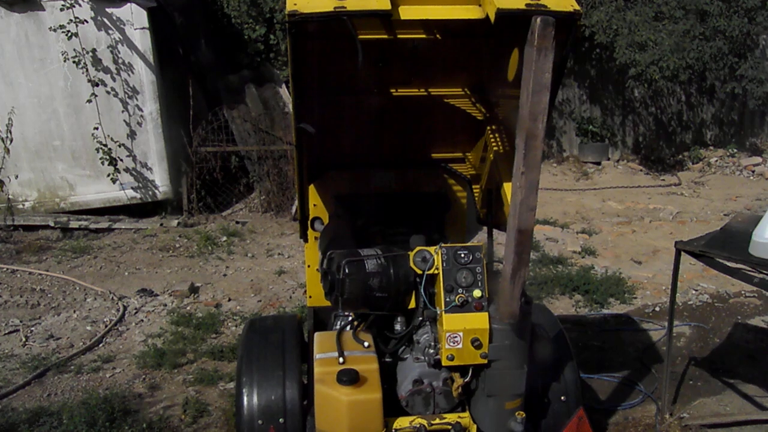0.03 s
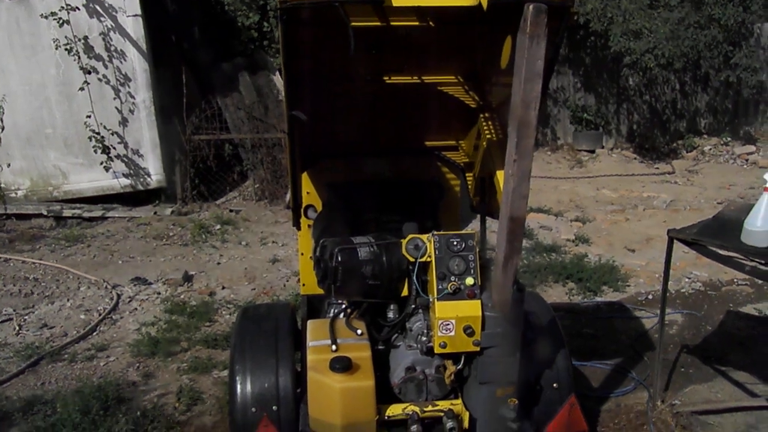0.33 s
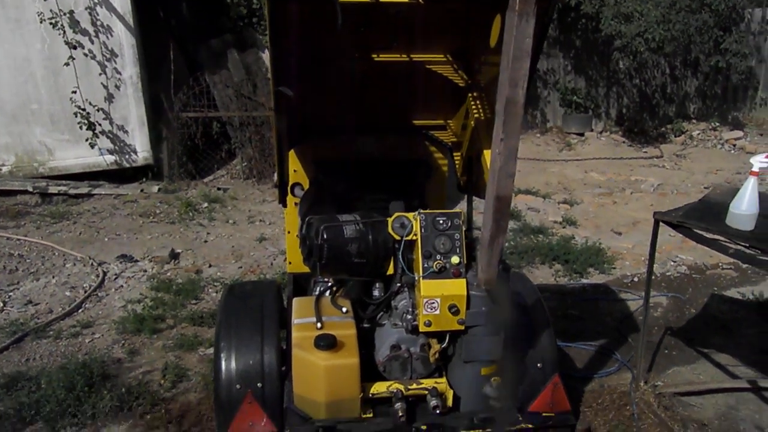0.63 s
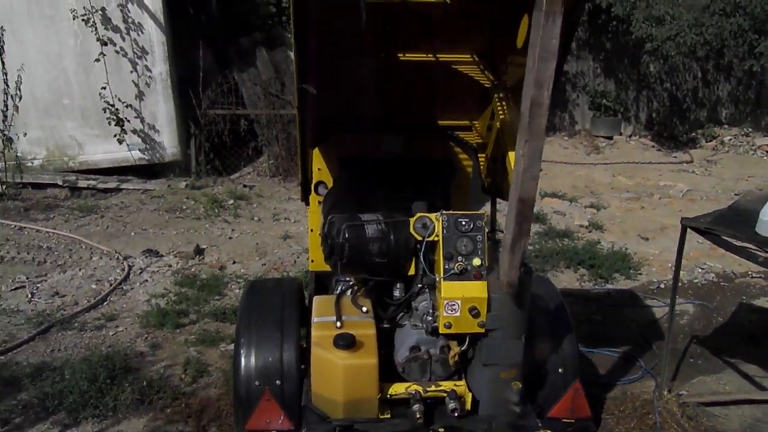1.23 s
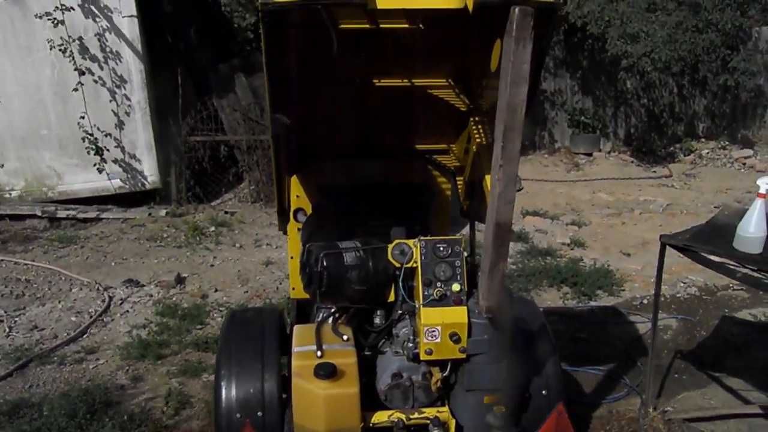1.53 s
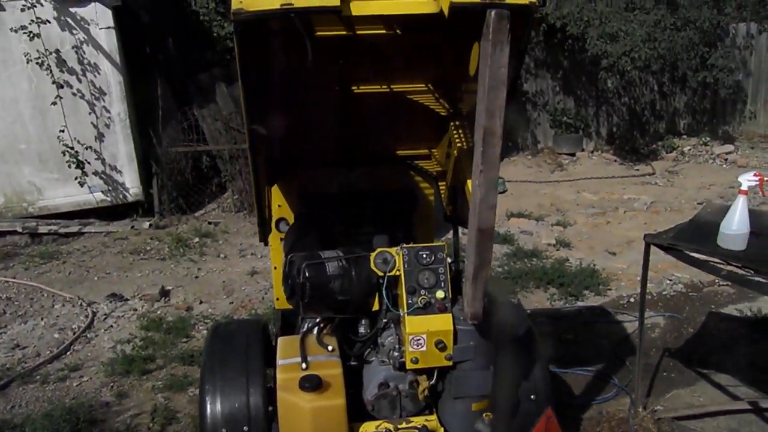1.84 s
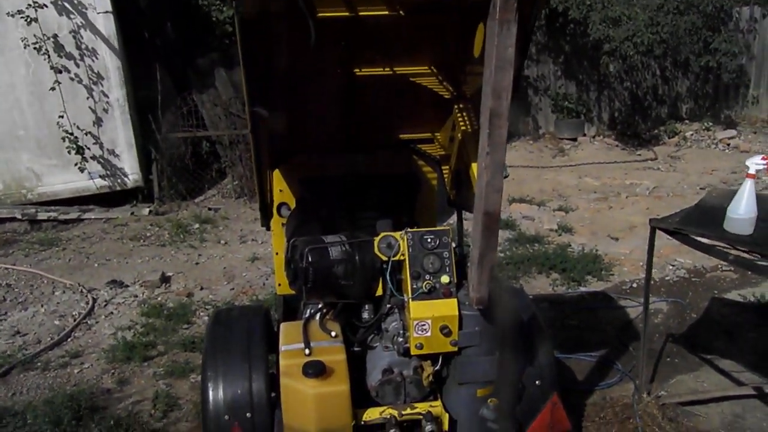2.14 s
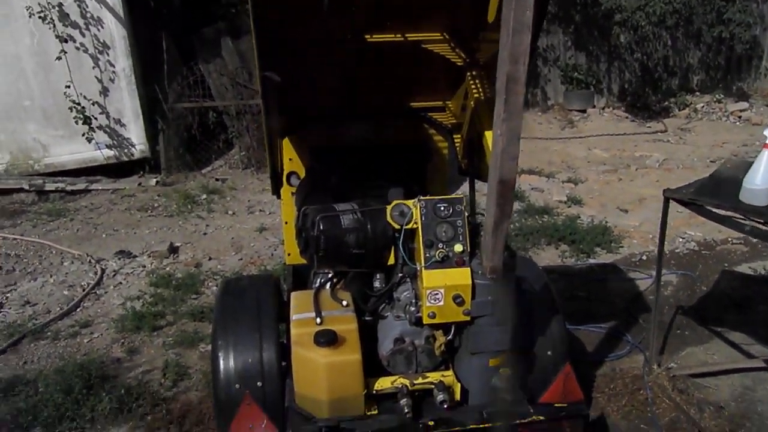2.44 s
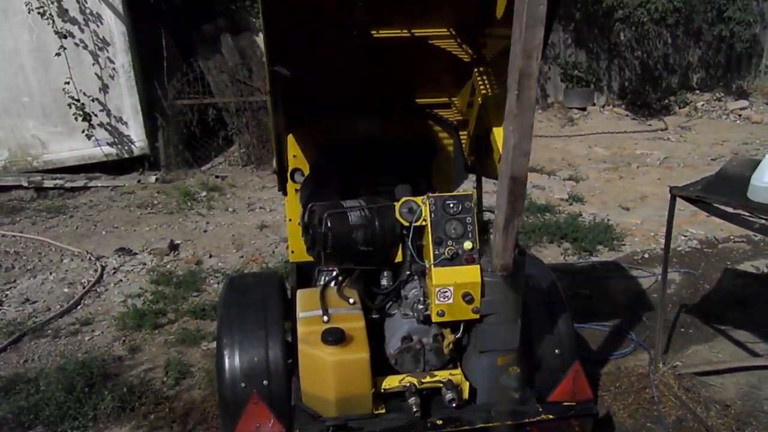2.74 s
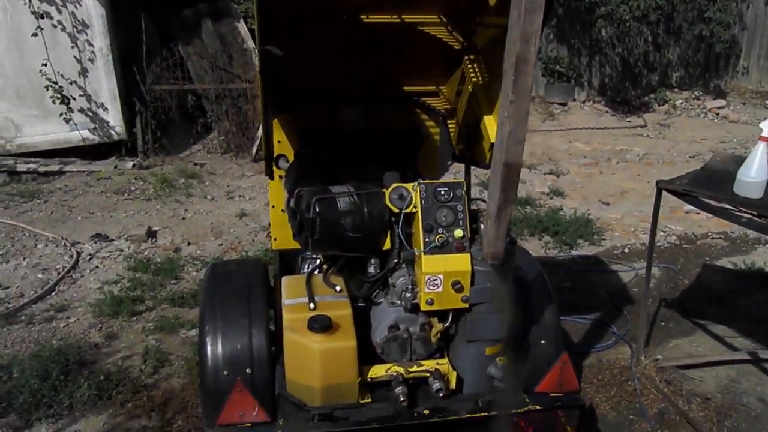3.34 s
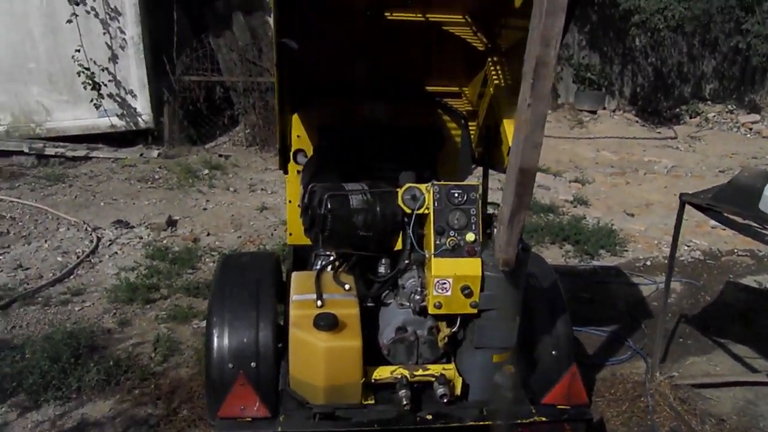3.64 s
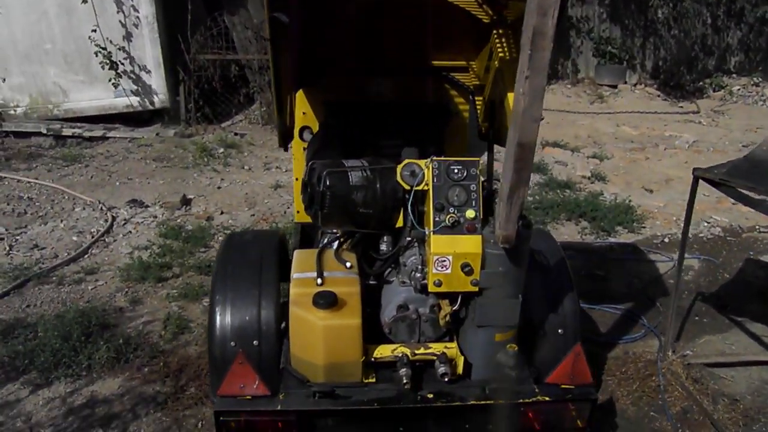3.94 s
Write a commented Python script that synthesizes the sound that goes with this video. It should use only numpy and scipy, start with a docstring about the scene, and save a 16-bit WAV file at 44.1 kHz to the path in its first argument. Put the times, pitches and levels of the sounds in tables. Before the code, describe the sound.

A diesel air compressor runs, hissing steadily over its knocking, clattering engine.

```python
"""A steady hiss of compressed air over a knocking diesel: a towed screw compressor, hood up, in a yard.
The rushing air rings in the pipes and the tank. The three-cylinder engine pulses, knocks and clatters
in the same pattern every cycle and makes a panel drone; the screw rotors add a thin whine.
Something near the microphone, probably a hand, colours the sound, then slides away by about 1.4 s."""
import sys
import numpy as np
from scipy import signal
from scipy.fft import rfft, irfft
from scipy.io import wavfile
from scipy.ndimage import map_coordinates

SR = 44100
rng = np.random.default_rng(int(sys.argv[2]) if len(sys.argv) > 2 else 0)


def persist_wave(psi):
    """Save psi, clipped to +-1, as 16-bit WAV."""
    counts = np.round(np.clip(psi, -1, 1) * 32767).astype(np.int16)
    wavfile.write(sys.argv[1], SR, np.atleast_2d(counts).T)


N = 176400
TIME_S = np.arange(N) / SR
BINS_HZ = np.arange(N // 2 + 1) * SR / N
CYCLE_HZ = 13.4


def from_db(db):
    return 10 ** (np.asarray(db) / 20)


def unit_rms(x):
    return x / np.sqrt(np.mean(x ** 2) + 1e-20)


def at_hz(points, hz):
    """Read a dB spectrum on a log-frequency axis."""
    f, db = np.transpose(points)
    return np.interp(np.log(np.maximum(hz, 1)), np.log(f), db)


def in_time(points):
    return np.interp(TIME_S, *np.transpose(points))


def drift(rate_hz):
    """Random wander through unit-variance knots."""
    return np.interp(TIME_S * rate_hz, np.arange(1000), rng.standard_normal(1000))


def noise(gain):
    """Noise of the given amplitude per root hertz."""
    return irfft(rfft(rng.standard_normal(N)) * gain, N) * np.sqrt(SR / 2)


def cycle_gain(cycles, spread_db=.8):
    """A fresh random strength for each engine cycle."""
    return from_db(spread_db * rng.standard_normal(100)[np.floor(cycles).astype(int) + 2])


# Turbulence spectrum: f/Hz, density/dB
AIR_SPECTRUM = [(1500, -88), (2600, -67.5), (2850, -69.5), (3100, -63.5), (3500, -64), (4200, -65.5),
                (5000, -65), (6000, -65), (7000, -64), (8200, -64), (9200, -62.5), (10500, -62),
                (11600, -63.5), (13000, -68), (14000, -70), (15700, -67.5)]
# Pipe and tank resonances: f/Hz, width/Hz, lift/dB
PIPE_RESONANCES = [(2960, 70, 6), (3193, 40, 9), (3305, 45, 8.5), (3490, 100, 6), (3675, 35, 5),
                   (3810, 45, 4), (4000, 120, 4), (4545, 70, 8.5), (4920, 70, 3), (5125, 35, 10),
                   (5200, 100, 5), (5690, 90, 8.5), (6040, 50, 5), (7320, 90, 4), (8540, 90, 7.5),
                   (8940, 70, 6), (9160, 80, 9), (9300, 70, 5), (9450, 70, 4), (9905, 45, 9),
                   (10010, 80, 7), (10350, 90, 6), (10555, 60, 6), (10810, 50, 5), (11150, 70, 4),
                   (11480, 80, 5.5), (11640, 80, 5.5), (12240, 100, 5.5), (12880, 70, 5), (13260, 80, 5),
                   (14520, 90, 3), (15060, 100, 6), (15260, 60, 5)]
# Flow strength: t/s, gain/dB
AIR_GAIN = [(.1, 1), (.8, 1), (1.3, 0.5), (1.8, 0.8), (2.4, 0.6), (3.0, 1), (3.5, 0), (4, 1.5)]

def air(cycles, flutter_db=.8, throb_db=.06):
    """Turbulent air rings pipes and tank; the flow flutters and throbs faintly with the firings."""
    power_lift = 1 + sum((from_db(db) ** 2 - 1) / (1 + (2 * (BINS_HZ - hz) / width_hz) ** 2) ** 1.5
                         for hz, width_hz, db in PIPE_RESONANCES)
    firing = np.cos(2 * np.pi * 3 * (cycles - .05))
    gain_db = in_time(AIR_GAIN) + flutter_db * drift(40) + throb_db * firing
    hiss = noise(from_db(at_hz(AIR_SPECTRUM, BINS_HZ)) * np.sqrt(power_lift))
    return from_db(gain_db) * hood_reflections(hiss)


def hood_reflections(x, depth_db=2.8, spacing_hz=75, rate_hz=1.4):
    """Reflections under the hood add and cancel differently as the microphone sways."""
    hz, times_s, frames = signal.stft(x, SR, nperseg=4096)
    grid = np.meshgrid(hz / spacing_hz, times_s * rate_hz, indexing="ij")
    ripple = map_coordinates(rng.standard_normal((1024, 64)), grid, order=1, mode="wrap")
    return signal.istft(frames * from_db(depth_db * ripple), SR)[1][:N]


# Combustion knocks and valve clacks: phase/cycles, f/Hz, width/Hz, rms level/dB, decay/s
KNOCK_PATTERN = [(.985, 2330, 480, -38.8, .003), (.02, 1950, 600, -43.5, .007),
                 (.305, 1900, 330, -43.5, .005), (.365, 1470, 240, -47, .005), (.43, 1850, 600, -52, .006),
                 (.635, 1480, 260, -51, .004), (.655, 2030, 600, -45, .005), (.735, 1680, 480, -45, .005),
                 (.85, 1800, 450, -53, .005)]
# Engine block modes: f/Hz, relative level/dB
BLOCK_RESONANCES = [(1190, 18), (1420, 10), (1475, 9), (1545, -16), (1700, 1), (1770, 2), (1878, 10),
                    (1960, -6), (2105, 4), (2225, 3), (2340, 1), (2470, 4), (2590, -3.5)]

def knocks(cycles, attack_s=.001, grit_db=-2.5):
    """Each knock rings the block modes near its pitch, alike in every cycle but with fresh grit."""
    out = 0
    mode_hz, mode_db = np.transpose(BLOCK_RESONANCES)
    ring_s = np.linspace(0, 1 / CYCLE_HZ, 4000)
    for phase, hz, width_hz, db, decay_s in KNOCK_PATTERN:
        age_s = (cycles - phase) % 1 / CYCLE_HZ
        envelope = np.minimum(age_s / attack_s, 1) * np.exp(-np.maximum(age_s - attack_s, 0) / decay_s)
        weights = from_db(mode_db) / (1 + (2 * (mode_hz - hz) / width_hz) ** 2)
        ring = np.sin(2 * np.pi * (ring_s[:, None] * mode_hz + rng.random(len(mode_hz)))) @ weights
        grit = noise(1 / (1 + (2 * (BINS_HZ - hz) / width_hz) ** 2))
        knock = unit_rms(envelope * np.interp(age_s, ring_s, ring))
        knock += from_db(grit_db) * unit_rms(envelope * grit)
        out += from_db(db) * cycle_gain(cycles - phase) * unit_rms(knock)
    return out


# Gear and valve train spectrum: f/Hz, density/dB
GEAR_SPECTRUM = [(60, -100), (180, -80.5), (280, -84.5), (350, -76), (420, -82.5), (560, -71.5), (700, -79),
                 (1050, -75), (1500, -84), (2200, -66), (3000, -111)]
# Loose-part spectrum: f/Hz, density/dB
RATTLE_SPECTRUM = [(25, -95), (60, -96), (130, -91), (210, -79.5), (300, -71), (420, -80), (600, -69.5),
                   (800, -70), (1100, -76.5), (1500, -69.5), (2100, -70), (2800, -80), (4000, -74)]
# Strength of both: t/s, gain/dB
CLATTER_GAIN = [(.1, 0), (1.3, 0), (1.55, -0.5), (1.9, -0.5), (2.6, -2), (3.3, -1.5), (4, -1)]

def clatter(cycles, size=8192):
    """Gears and valve train repeat one dense pattern each cycle; loose parts rattle at random."""
    hz = np.arange(size // 2 + 1) * CYCLE_HZ
    in_band = (hz > 0) & (hz < GEAR_SPECTRUM[-1][0])
    lines = from_db(at_hz(GEAR_SPECTRUM, hz)) * in_band * np.exp(2j * np.pi * rng.random(len(hz)))
    pattern = irfft(lines) * size * np.sqrt(CYCLE_HZ / 2)
    gears = np.interp(cycles, np.arange(size) / size, pattern, period=1)
    rattle = noise(from_db(at_hz(RATTLE_SPECTRUM, BINS_HZ)))
    return from_db(in_time(CLATTER_GAIN)) * (gears + rattle)


# Panel swells: phase/cycles, f/Hz, Gaussian sigma/s, relative level/dB
PANEL_SWELLS = [(.1869, 565, .0051, -5), (.6676, 561, .0146, -1.5), (.9402, 533, .0059, 0)]

def panel(cycles, level_db=-36.5):
    """A sheet-metal panel drones in three uneven swells per cycle, one per cylinder."""
    out = 0
    for phase, hz, sigma_s, db in PANEL_SWELLS:
        swell_cycles = cycles - phase + .5
        offset_s = (swell_cycles % 1 - .5) / CYCLE_HZ
        swell = np.exp(-.5 * (offset_s / sigma_s) ** 2) * np.cos(2 * np.pi * hz * offset_s)
        out += from_db(level_db + db) * cycle_gain(swell_cycles) * swell
    return out


# Exhaust and block tones: multiple of the cycle rate, rms level/dB
EXHAUST_ORDERS = [(6, -67), (9, -60.5), (12, -63), (18, -57), (19, -63.5), (21, -55), (24, -60.5),
                  (35, -69.5), (54, -55.5), (65, -75), (75, -63.5), (78, -58.5)]

def exhaust(cycles, waver_db=3.1):
    """Clean tones locked to the crankshaft, each wavering in level."""
    out = 0
    for order, db in EXHAUST_ORDERS:
        amplitude = from_db(db + waver_db * drift(4.96)) * np.sqrt(2)
        out += amplitude * np.sin(2 * np.pi * (order * cycles + rng.random()))
    return out


# Rotor whine: t/s, rms level/dB
ROTOR_LEVEL = [(.1, -50), (1.5, -59), (2.5, -53), (3.2, -56), (3.5, -49.5), (4, -52)]

def rotor_whine(cycles, pitch_hz=944):
    """The meshing screw rotors give one thin tone."""
    return from_db(in_time(ROTOR_LEVEL)) * np.sqrt(2) * np.sin(2 * np.pi * pitch_hz * cycles / CYCLE_HZ)


def scene(jitter_s=.00015):
    """One crankshaft times every layer."""
    cycles = CYCLE_HZ * (TIME_S + jitter_s * drift(6))
    engine = exhaust(cycles) + knocks(cycles) + panel(cycles) + clatter(cycles)
    return (engine + rotor_whine(cycles) + air(cycles))[None]


# Hollow between hand and microphone: f/Hz, gain/dB
HOLLOW_RESPONSE = [(100, -3), (600, -4.5), (1400, -3), (2300, 4), (3000, 4.5), (3280, 1), (3600, 6.5),
                   (4000, -0.5), (4300, 3), (4750, 0), (5150, 6.5), (5700, -1.5), (6250, -1.5), (7150, -15),
                   (7900, -4.5), (8700, 0.5), (10500, 1), (12000, -2), (14000, -3), (15700, -3.5)]
# Hand movement: t/s, closeness/0-1, tuning ratio of the hollow
HAND_PATH = [(0, 1, 1), (1.19, 1, 1), (1.26, .8, 1.06), (1.32, .85, 1.0), (1.37, .6, .86), (1.395, .3, .78),
             (1.43, 0, .7)]

def hand(x, full_slide_hz=6000):
    """The hollow's colour fades as the hand leaves, its treble dip and peak sliding down."""
    hz, times_s, frames = signal.stft(x, SR, nperseg=1024)
    path_s, closeness, tuning = np.transpose(HAND_PATH)
    slide_share = np.minimum(hz[:, None] / full_slide_hz, 1) ** 2
    slide = np.interp(times_s, path_s, tuning) ** slide_share
    colour_db = np.interp(times_s, path_s, closeness) * at_hz(HOLLOW_RESPONSE, hz[:, None] / slide)
    return signal.istft(frames * from_db(colour_db), SR)[1][:, :N]


def record(dry, notch_hz=7875, notch_width_hz=150, start_s=.1, cutoff_hz=15700):
    """Hand colour, a narrow treble notch, an abrupt switch-on and a steep top cut."""
    notch = signal.iirnotch(notch_hz, notch_hz / notch_width_hz, SR)
    switched_on = signal.lfilter(*notch, hand(dry)) * (TIME_S > start_s)
    return irfft(rfft(switched_on) / np.sqrt(1 + (BINS_HZ / cutoff_hz) ** 1500), N)


dry = scene()
out = record(dry)
persist_wave(out)
```